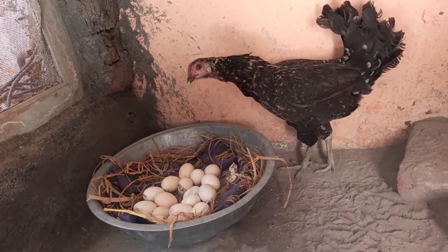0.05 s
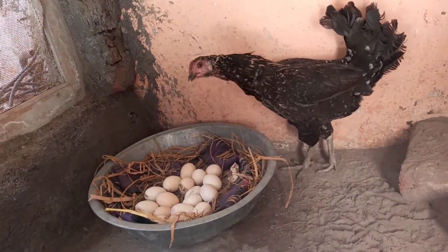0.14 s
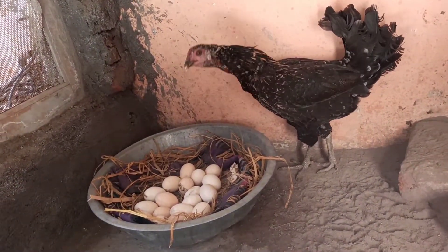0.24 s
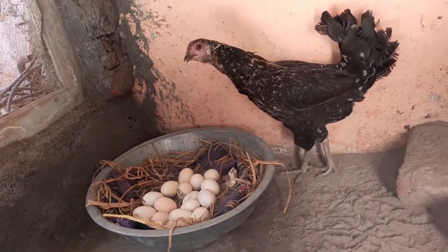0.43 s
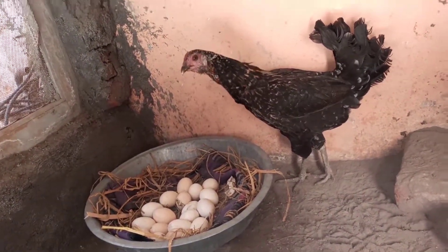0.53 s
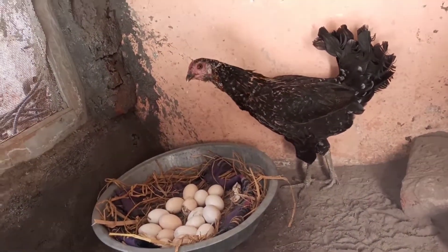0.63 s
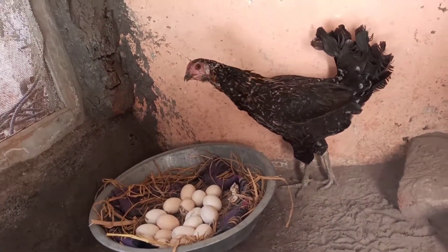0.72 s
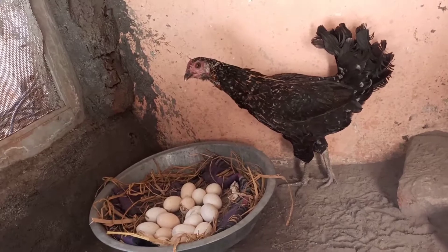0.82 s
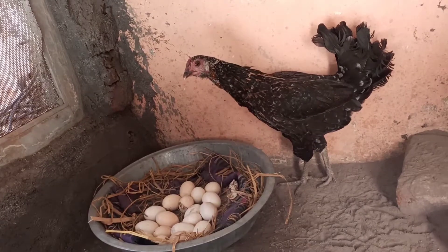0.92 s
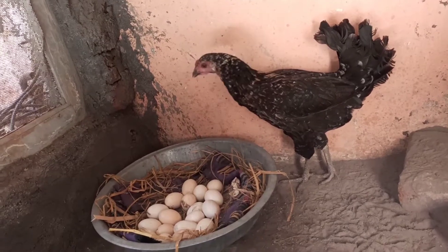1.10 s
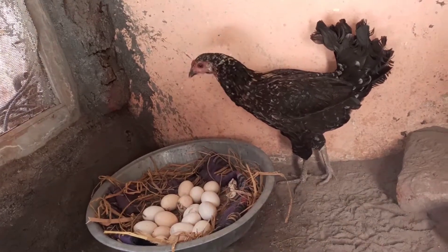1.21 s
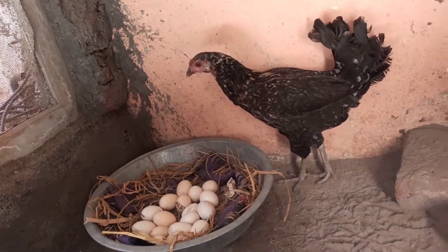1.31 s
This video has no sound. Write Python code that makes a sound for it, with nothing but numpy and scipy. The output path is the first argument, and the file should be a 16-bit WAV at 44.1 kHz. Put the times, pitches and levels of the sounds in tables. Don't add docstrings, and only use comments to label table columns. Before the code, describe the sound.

A hen close to a phone microphone in a small, hard-walled shed gives a faint cluck at 0.08 seconds and a brighter one at 0.13, then a loud, rasping squawk from 0.23 to 0.41. A low cluck follows at 0.57, then a faint straw tick. From 0.7 to 1.2 a farther hen growls, throbbing and falling. Faint bird twitter and a tiny cluck near 1.34 end over soft hum and hiss.

```python
import sys
import numpy as np
from scipy import signal
from scipy.fft import rfft, irfft, next_fast_len
from scipy.io import wavfile
from scipy.ndimage import uniform_filter1d, minimum_filter1d

SR = 44100
rng = np.random.default_rng(int(sys.argv[2]) if len(sys.argv) > 2 else 0)


def output_pcm(signal):
    pcm = np.clip(np.atleast_2d(signal).T, -1, 1) * 32767
    wavfile.write(sys.argv[1], SR, np.round(pcm).astype(np.int16))


def rack_gain(trim_db):
    fader = np.asarray(trim_db, float)
    return 10 ** (fader / 20)


N = 59535
MOUTH_HZ = 2000


def evened(x):
    return x / np.sqrt(np.mean(x ** 2) + 1e-20)


def read(points, hz):
    f, value = np.transpose(points)
    return np.interp(np.log(hz + 1), np.log(f + 1), value)


def add(mix, s, sound):
    part = mix[round(s * SR):][:len(sound)]
    part += sound[:len(part)]


def late(x, s):
    size = next_fast_len(N + 4096)
    hz = np.fft.rfftfreq(size, 1 / SR)
    return irfft(rfft(x, size) * np.exp(-2j * np.pi * hz * s), size)[:N]


def resonate(x, hz, width):
    turn = np.exp(2j * np.pi * np.cumsum(hz + 0 * x) / SR)
    r = np.exp(-np.pi * 1.5 * width / SR)
    smooth = signal.lfilter([(1 - r) ** 2], [1, -2 * r, r * r], x / turn)
    return 2 * (turn * smooth).real


def voice(hz, rough, throat, jitter, shimmer_db, half, dull_hz):
    wander, shimmer, air = rng.standard_normal((len(hz), 3)).T
    rough = np.clip(rough, 0, 1)
    wander = evened(uniform_filter1d(wander, size=150))
    turns = np.cumsum(hz * (1 + jitter * rough * wander)) / SR
    k = np.arange(1, 140)[:, None] / 2
    strength = np.where(k % 1, half * rough, 1) * (k * hz < 16000)
    folds = (strength * np.cos(2 * np.pi * k * turns)).sum(0)
    folds = evened(folds) * rack_gain(shimmer_db * evened(uniform_filter1d(shimmer, size=250)))
    r = np.exp(-2 * np.pi * dull_hz / SR)
    breath = signal.lfilter([1 - r], [1, -r], air) + 0.088 * air
    puffs = evened((0.63 + np.exp(-(turns % 1) / 0.81)) * breath)
    drive = np.sqrt(1 - rough ** 2) * folds + rough * puffs
    return [(-1) ** i * rack_gain(db) * resonate(drive, f, w) for i, (f, w, db) in enumerate(throat)]


def controls(table):
    s, *cols = np.transpose(table)
    t = np.arange(s[0], s[-1], 1 / SR)
    return (t, *(np.interp(t, s, v) for v in cols))


def hiss():
    # (frequency [Hz], level per Hz [dB])
    floor_colour = [(45, -30.5), (60, -1), (85, -4.5), (330, -7), (1200, -18), (2900, -21), (4500, -28),
                    (15500, -35.5)]
    # (frequency [Hz], correlation [-1 to 1])
    likeness = [(60, 0.56), (380, 0.71), (2380, -0.19), (15000, 0.0099)]
    frames, hz = N // 256 + 5, np.fft.rfftfreq(1024, 1 / SR)
    a, b, c, d, patches = rng.standard_normal((frames, 513, 5)).T
    patches = uniform_filter1d(uniform_filter1d(patches, size=10, axis=0), size=10, axis=1)
    drift_db = 3.6 * evened(patches) * (hz / (hz + 500))[:, None]
    same, left = np.clip(read(likeness, hz), -1, 1)[:, None], a + 1j * b
    z = np.array([left, same * left + np.sqrt(1 - same ** 2) * (c + 1j * d)])
    z = z * rack_gain(read(floor_colour, hz)[:, None] + drift_db)
    return rack_gain(-52.5) * evened(signal.istft(z, nperseg=1024, noverlap=768)[1][:, :N])


def twitter(far):
    # (start [s], length [s], level [dB], from pitch [Hz], to pitch [Hz])
    whistles = [
        (1.13, .22, -69, 3850, 4000),
        (1.17, .18, -69, 2550, 3050),
        (1.22, .13, -70, 1900, 2200),
        (0, .12, -68, 2900, 2950),
    ]
    for start, length, level_db, from_hz, to_hz in whistles:
        u = np.linspace(0, 1, round(length * SR))
        fuzz = resonate(rng.standard_normal(len(u)), from_hz + (to_hz - from_hz) * u, 170)
        add(far, start, rack_gain(level_db) * np.sin(np.pi * u) ** .5 * evened(fuzz))


def beak_pops(near):
    # (start [s], level [dB], pitch [Hz])
    pops = [
        (.075, -43.5, 807),
        (.128, -27.5, 980),
        (0.231, -14, 880),
        (0.568, -27, 820),
    ]
    length_s = 0.0124
    t = np.arange(0, length_s, 1 / SR)
    swell = np.sin(np.pi * (t / length_s) ** 1.28)
    for start, level_db, hz in pops:
        add(near, start, rack_gain(level_db) * np.sqrt(2) * swell * np.sin(2 * np.pi * hz * t))


def cluck(start, length, level_db, pitch_hz, mouth, table):
    u = np.linspace(0, 1, round(length * SR))
    treble_db = 150 * np.log10(mouth)
    throat = [(f * mouth, w * mouth, db) if f < MOUTH_HZ else (f, w, db + treble_db) for f, w, db in table]
    hz = pitch_hz * (1 + .06 * (u - .5))
    sound = sum(voice(hz, .46 + 0 * u, throat, jitter=.05, shimmer_db=2.5, half=.1, dull_hz=4000))
    shape = np.minimum(u / .5, 1) ** 0.7 * np.minimum((1 - u) / 0.12, 1)
    return start, rack_gain(level_db) * shape * evened(sound)


def low_clucks(near):
    # (start [s], length [s], level [dB], pitch [Hz], mouth opening [1 = as listed])
    clucks = [
        (0.077, .02, -38, 222, 0.95),
        (.571, .033, -20.5, 217, 1.0),
        (0.645, 0.068, -49, 209.6, 0.4),
        (1.339, 0.024, -43.5, 231.4, 0.56),
    ]
    # (resonance [Hz], width [Hz], level [dB])
    narrow_throat = [(220, 80, -7), (436, 83, 0), (671, 150, 1), (1065, 131, 1), (1416, 200, -10.5),
                     (1830, 313, -11), (3420, 540, -17), (4470, 230, -20.5), (7000, 2000, -26.5),
                     (13600, 1100, -51)]
    for row in clucks:
        add(near, *cluck(*row, table=narrow_throat))


def bright_cluck(near):
    # (start [s], length [s], level [dB], pitch [Hz], mouth opening [1 = as listed])
    bright = (.1335, .029, -22.5, 232, 1)
    # (resonance [Hz], width [Hz], level [dB])
    half_open_throat = [(440, 43, -8), (683, 128, 1.5), (960, 490, -9), (1420, 198, 2.5), (1853, 205, -3),
                        (2370, 220, -14), (3190, 1100, -19.5), (4220, 320, -14), (6850, 2000, -24),
                        (13500, 2700, -56.5)]
    add(near, *cluck(*bright, table=half_open_throat))


def squawk(near):
    # (time [s], level [dB], pitch [Hz], roughness [0-1], clear tone [dB])
    squawk_course = [(.233, -27, 540.7, 0.94, -38.5), (.243, -9, 551.4, 0.95, -28),
                     (.26, -21, 551.4, .6, -17), (.29, -11.5, 555.5, 0.81, -20.5),
                     (.326, -18.5, 561, .55, -12.5), (.338, -20.5, 569.7, 0.69, -24.5),
                     (.352, -16, 573.7, 0.57, -14), (.394, -13.5, 573.4, 0.87, -19.5),
                     (.412, -17.5, 575.5, 1, -22.5)]
    # (resonance [Hz], width [Hz], level [dB])
    wide_throat = [(399, 53, -21.5), (820, 261, -9), (1186, 194, -5), (1562, 398, -7), (2280, 645, -10.5),
                   (2960, 312, -7), (3916, 970, -8.5), (4610, 640, -8.5), (6160, 950, -15.5),
                   (9100, 1670, -12.5), (12170, 920, -34), (14550, 4300, -26)]
    # (multiple of the pitch, level [dB], waver [dB])
    clear_partials = [(1, -22, 6), (2, 2, 1), (3, -12, 1), (4, -13.5, 5.5), (5, -8.5, 1.5), (6, -17.5, -1),
                      (7, -14.5, 2.5), (8, -17.5, 5.5), (10, -24.5, 4), (12, -20.5, 5.5), (13, -17.5, 4.5),
                      (15, -25, 6.5)]
    low_bands = 6
    t, level_db, hz, rough, clear_db = controls(squawk_course)
    bands = voice(hz, rough, wide_throat, jitter=0.0403, shimmer_db=2.5, half=0.63, dull_hz=1800)
    shuts = np.clip((t[-1] - t) / 0.029, 0, 1)
    k, db, waver_db = np.transpose(clear_partials)[:, :, None]
    waver = uniform_filter1d(rng.standard_normal((len(k), len(t))), size=500)
    waver = evened(uniform_filter1d(waver, size=500))
    turns = k * np.cumsum(hz) / SR + rng.random((len(k), 1)) + .012 * k * waver[::-1]
    clear = rack_gain(db + waver_db * waver) * np.sin(2 * np.pi * turns)
    clear = np.sqrt(2) * (clear * np.where(k > low_bands, shuts, 1)).sum(0)
    harsh = evened(sum(bands[:low_bands]) + shuts * sum(bands[low_bands:]))
    end = np.minimum((t[-1] - t) / 0.0039, 1)
    add(near, t[0], end * (rack_gain(level_db) * harsh + rack_gain(clear_db) * clear))


def side_notes(near):
    # (start [s], length [s], level [dB], pitch [Hz])
    voice_breaks = [(.236, 0.021, -20, 650), (.238, 0.028, -23, 1410), (.272, 0.024, -21, 725),
                    (.28, 0.022, -23, 1352), (.335, .024, -31.5, 411), (.33, .04, -22, 2156),
                    (.368, .04, -28, 750), (.385, 0.018, -25, 2215), (.39, 0.039, -27.5, 1040),
                    (.648, 0.061, -50.5, 212), (.578, 0.032, -30.5, 660), (1.5, 0.034, -45, 520),
                    (.236, 0.014, -28, 4000)]
    for start, length, level_db, hz in voice_breaks:
        t = np.arange(0, length, 1 / SR)
        drift = .05 * evened(uniform_filter1d(rng.standard_normal(len(t)), size=200))
        note = np.sin(np.pi * t / length) * np.sin(2 * np.pi * (hz * t + drift))
        add(near, start, rack_gain(level_db) * np.sqrt(2) * note)


def straw_ticks(far):
    # (time [s], level [dB])
    ticks = [
        (0.662, -57.5),
        (.906, -80),
    ]
    for s, db in ticks:
        burst = rng.standard_normal(130) * np.exp(-np.arange(130) / 30.)
        add(far, s, rack_gain(db) * np.diff(burst, 2))


def growl(far):
    # (time [s], level [dB], pitch [Hz], roughness [0-1])
    growl_course = [(.715, -43, 486.3, 0.18), (.728, -36, 482, 0.2), (.77, -38.5, 465, 0.16),
                    (.80, -37, 456.2, 0.51), (.9, -37.5, 440, 0.6), (.99, -38, 428.3, 0.39),
                    (1.06, -35.5, 410.7, 0.61), (1.16, -45, 379.5, 0.58), (1.21, -70, 352.7, 0.5)]
    # (resonance [Hz], width [Hz], level [dB])
    far_throat = [(440, 88, -0.5), (880, 216, 1), (1313, 300, -6), (1720, 320, -12.5), (2320, 610, -22),
                  (3530, 140, -27)]
    # (time [s], level [dB])
    throbs = [(0.724, -1), (0.738, -1), (0.749, -6.5), (0.760, 7.5), (0.787, -2), (.808, 3.5), (.835, -3),
              (0.86, 6), (.895, -3.5), (0.924, 1), (0.978, 9), (1.008, 1), (1.041, 3.5), (1.085, 1.5),
              (1.108, -2.5), (1.13, -1), (1.15, -1.5)]
    rise_s, fall_s, rest = 0.003, 0.011, 0.1
    t, level_db, hz, rough = controls(growl_course)
    throat = [(f * hz / 440 if f < MOUTH_HZ else f, w, db) for f, w, db in far_throat]
    chest, *upper = voice(hz, rough, throat, jitter=.12, shimmer_db=2, half=.1, dull_hz=3000)
    throb_s, throb_db = np.transpose(throbs)[:, :, None]
    since = np.maximum(t - throb_s, 0)
    beats = rack_gain(throb_db) * 2 * (1 - np.exp(-since / rise_s)) * np.exp(-since / fall_s)
    throb = rest + beats.sum(0)
    joins = rack_gain(-36 * np.clip((.792 - t) / 0.01, 0, 1))
    even = upper[0] + upper[2]
    odd = sum(upper) - even
    wobble = 1 + 0.22 * evened(uniform_filter1d(rng.standard_normal(len(t)), size=900))
    flutter = 1 + 1.42 * np.cos(2 * np.pi * 61.92 * np.cumsum(wobble) / SR)
    add(far, t[0], rack_gain(level_db) * evened(chest * joins * flutter + throb * (even + joins * odd)))


def ports(pair):
    # (frequency [Hz], lead [radians])
    port_turn = [(100, 1), (1200, -0.9), (1900, 3.5), (3360, 18), (3800, 14.5), (5700, 13.5), (8870, 24),
                 (15300, 28)]
    # (frequency [Hz], level [dB])
    port_db = [(60, -2.5), (130, 1), (290, -0.5), (640, 5), (1130, 0), (3100, -0.5), (6820, 0.5),
               (15000, 0.5)]
    size = next_fast_len(N + 4096)
    hz = np.fft.rfftfreq(size, 1 / SR)
    half = rack_gain(read(port_db, hz) / 2)
    colour = np.array([half, np.exp(-1j * read(port_turn, hz)) / half])
    return irfft(rfft(pair, size) * colour, size)[:, :N]


def walls(x):
    # (left delay [s], right delay [s], level [dB])
    first_echoes = [(.0009, 0.001024, -9.5), (.0031, 0.0023, -12.5), (.0068, 0.0046, -14),
                    (.0115, 0.0088, -17), (.017, 0.014, -20), (0.0244, 0.027, -14)]
    return np.array([sum(rack_gain(row[2]) * late(x, row[side]) for row in first_echoes) for side in range(2)])


def tail(x, share):
    # (frequency [Hz], time to fall 60 dB [s])
    shed_decay = [(200, 0.86), (1000, 0.43), (3000, 0.35), (8000, 0.23)]
    taps = np.zeros((2, SR))
    at = np.arange(300, SR - 20, 20)
    at = at + rng.integers(0, 20, (2, len(at)))
    np.put_along_axis(taps, at, rng.choice([-1., 1.], at.shape), 1)
    hz, t, z = signal.stft(taps, SR, nperseg=256)
    fade = rack_gain(-60 * t / (share * read(shed_decay, hz)[:, None]))
    room = signal.istft(z * fade, SR, nperseg=256)[1]
    room = np.array([room[0], 0.62 * room[0] + 1.08 * room[1]])
    return signal.fftconvolve(x[None], room / np.linalg.norm(room[0]), axes=1)[:, :N]


def scene():
    near, far = np.zeros((2, N))
    twitter(far)
    beak_pops(near)
    low_clucks(near)
    bright_cluck(near)
    squawk(near)
    side_notes(near)
    straw_ticks(far)
    growl(far)
    direct = np.array([rack_gain(-1.5) * far, late(far, 0.00031)])
    distant = direct + rack_gain(-8) * walls(far) + rack_gain(-6.5) * tail(far, 0.57)
    tails = rack_gain(-20.5) * tail(near, 0.99) + rack_gain(-13.5) * tail(near, 0.25)
    return rack_gain(-0.5) * (ports(near + walls(near)) + tails + distant) + hiss()


def band_limit(x):
    return signal.sosfilt(signal.butter(12, 15740, fs=SR, output="sos"), x)


def record(dry):
    gap_from_hz, gap_to_hz, edge_hz, bass_hz = 8750, 11550, 15450, 56
    knee_db, squeeze = -7, 0.51
    size = next_fast_len(N + 4096)
    hz = np.fft.rfftfreq(size, 1 / SR)
    inside_hz = np.minimum(hz - gap_from_hz + 400, gap_to_hz - hz + 60)
    gap = np.clip(inside_hz / np.where(hz < 10000, 500, 100), 0, 1)
    peak = -minimum_filter1d(-abs(dry).max(0), size=90)
    peak_db = 20 * np.log10(uniform_filter1d(peak, size=90) + 1e-9)
    squeezed = dry / rack_gain(squeeze * np.maximum(peak_db - knee_db, 0))
    colour = rack_gain(-44 * gap) * (hz < edge_hz) / np.sqrt(1 + (bass_hz / (hz + 1)) ** 10)
    mix = irfft(rfft(squeezed, size) * colour, size)[:, :N]
    return band_limit(mix)


dry = scene()
out = record(dry)
output_pcm(out)
```